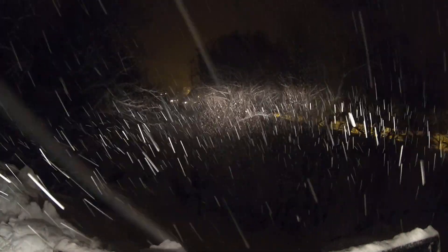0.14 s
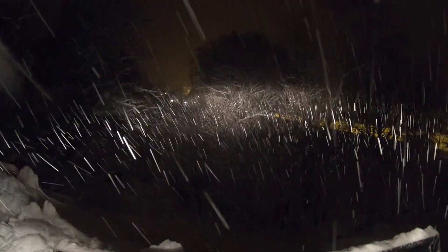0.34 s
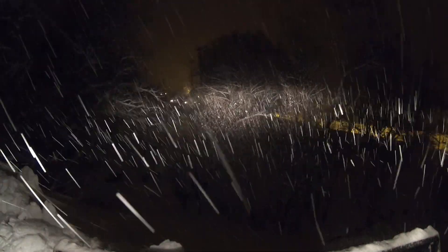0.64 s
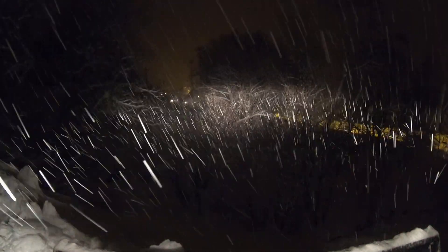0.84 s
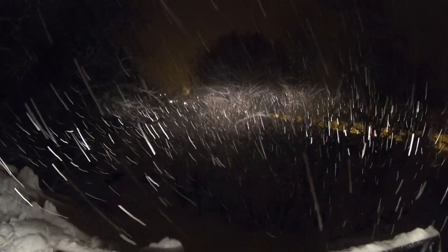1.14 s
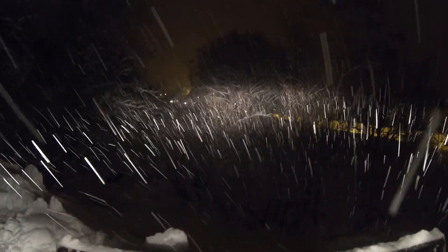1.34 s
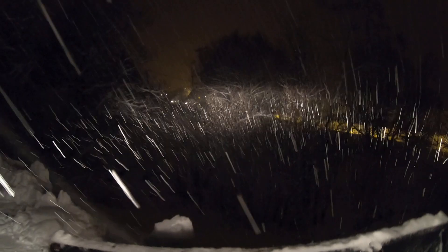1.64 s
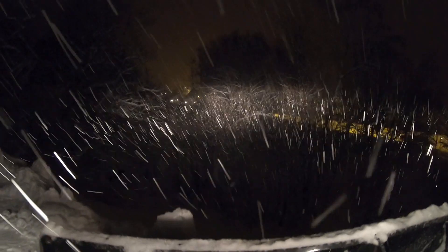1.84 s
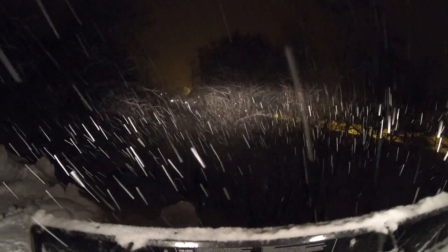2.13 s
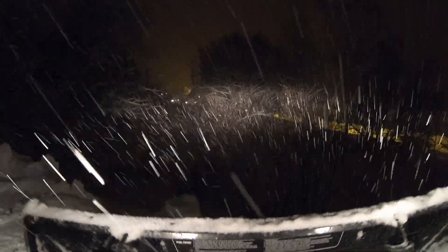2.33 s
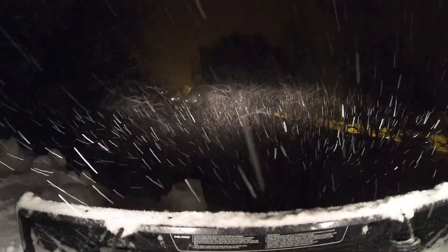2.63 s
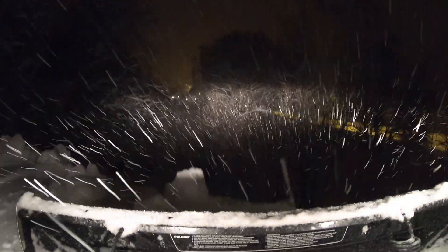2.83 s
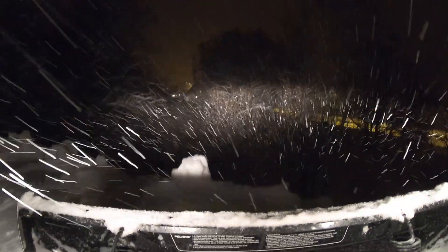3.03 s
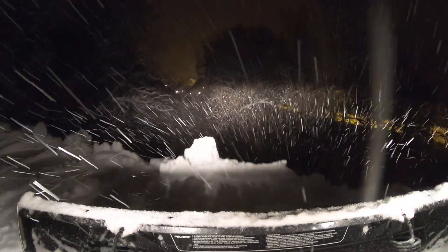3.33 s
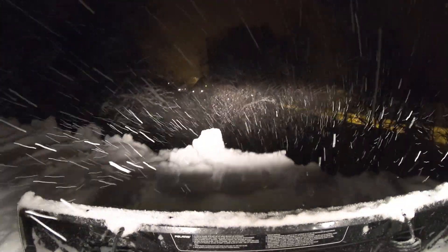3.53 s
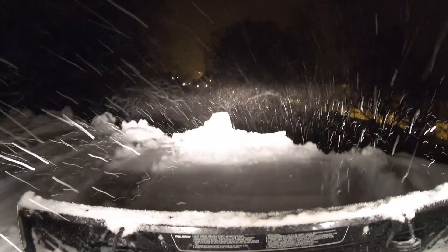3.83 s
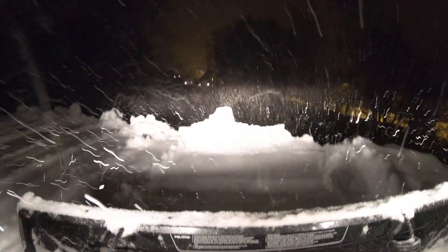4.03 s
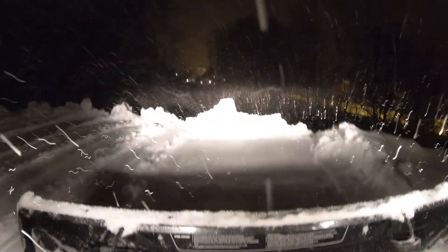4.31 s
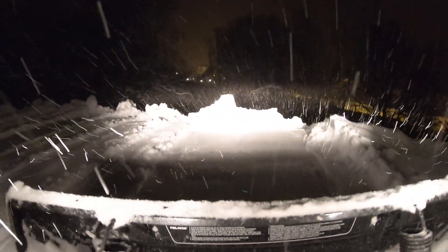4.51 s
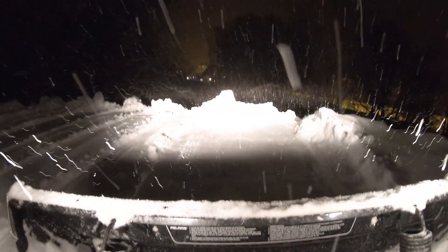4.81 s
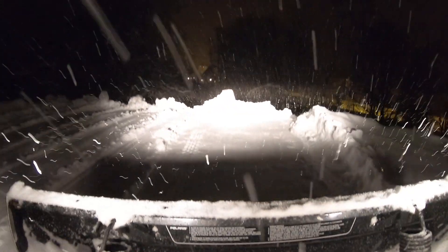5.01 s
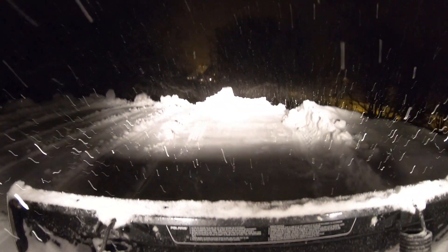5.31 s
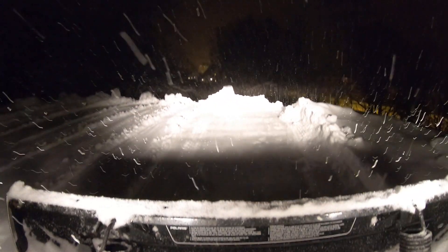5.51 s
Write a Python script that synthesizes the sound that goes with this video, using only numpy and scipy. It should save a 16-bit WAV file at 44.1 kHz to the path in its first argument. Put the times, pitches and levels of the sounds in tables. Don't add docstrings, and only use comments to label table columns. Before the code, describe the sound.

Low engine putter, a heavy jolt, blade scrape and sharp clacks, a geared motor whir, then a climbing engine drone with faint bracket chatter.

```python
import sys
import numpy as np
from scipy import signal
from scipy.fft import rfft, irfft, next_fast_len
from scipy.io import wavfile
from scipy.ndimage import map_coordinates

SR = 44100
rng = np.random.default_rng(int(sys.argv[2]) if len(sys.argv) > 2 else 0)


def field_ratio(decibels):
    return 10 ** (np.asarray(decibels, dtype=float) / 20)


def generate_wav(signal):
    frames = np.transpose(np.atleast_2d(signal))
    scaled = np.clip(frames, -1, 1) * 32767
    pcm = np.round(scaled).astype(np.int16)
    wavfile.write(sys.argv[1], SR, pcm)


N = 249606
T = np.arange(N) / SR

# freq_hz, gain_db
TOP_LOSS = [(9000, 0.5), (11000, 2.5), (13000, -24.5), (16000, -47)]
# freq_hz, level_db
WHINE_TONES = [(11752, -75), (12252, -78)]
# freq_hz, width_hz, level_db
PANEL_MODES = [(860, 30, -3), (1045, 55, 0)]
# freq_hz, density_db_per_hz
FIZZ_SPECTRUM = [(6000, -61.5), (7200, 0.5), (9000, -5), (11000, -28), (14000, -65)]
IDLE_WHISTLE_HZ, IDLE_WHISTLE_DB = 708, -58.5

# start_s, stop_s, level_db
CHATTER_BOUTS = [
    (4.305, 4.554, -57),
    (4.682, 4.855, -63),
    (4.887, 5.103, -61),
    (5.15, 5.24, -62.5),
    (5.286, 5.603, -63),
    (5.623, 5.698, -76),
]
# freq_hz, width_hz, level_db
BRACKET_MODES = [(4420, 610, -2), (6190, 530, -1), (8860, 1760, -18), (2580, 300, -9.5), (13560, 1100, -17)]
# position_cycles, level_db
BRACKET_TAPS = [(.14, -2), (.215, -10), (.455, -5)]
# rate_firings_per_s, advance_cycles
TAP_ADVANCE = [(23.3, .035), (25, 0)]
LULL_START_S, LULL_STOP_S, LULL_DB = 4.67, 5.7, -67
CHATTER_EDGE_S, SAG_DB_PER_S = .005, 12

# start_s, stop_s, gear_hiss_db, drum_tone_db
WINCH_RUNS = [
    (1.443, 2.474, -44.5, -42),
    (4.362, 4.553, -51.5, -60),
]
# freq_hz, density_db_per_hz
GEAR_SPECTRUM = [(1820, -41), (3100, -18.5), (3320, -9.5), (3570, -14), (3750, -6.5), (4330, -5.5),
                 (4690, 0.5), (5180, -2), (6240, 1), (6680, -3.5), (7080, -20), (7400, -15), (9620, -31),
                 (16300, -120)]
# freq_hz, width_hz, level_db
DRUM_MODES = [(948, 58, 0), (1610, 100, -9), (2030, 60, -8), (522, 42, -3)]
# time_s, level_db
RELAY_BLOWS = [
    (1.42, -33.5),
    (2.49, -27.5),
    (4.555, -36.5),
]
# freq_hz, width_hz, level_db
COVER_MODES = [(4730, 170, -39), (5780, 99, -8.5), (6390, 51, -4.5)]
# freq_hz, width_hz, level_db
STRUCK_DRUM_MODES = [(953, 48, 1.5)]
INRUSH_DB, INRUSH_S, SPIN_UP_S = 4, 0.18, 0.081
OVERRUN_S = .012

# time_s, peak_db, t60_s
SNAP_HITS = [(1.062, -37, 0.02), (1.2324, -34, 0.018), (1.2855, -23, 0.02), (1.2944, -23, 0.026),
             (1.3064, -32, 0.02), (1.3389, -32, 0.14), (1.3454, -43, 0.027), (1.4097, -28.5, 0.07),
             (1.4214, -30.5, 0.082), (1.4344, -31, 0.039), (2.4877, -26, 0.075), (2.5651, -40, 0.03),
             (2.577, -36.5, 0.049), (2.596, -39.5, 0.081), (2.6144, -41, 0.052), (2.6773, -44.5, 0.062),
             (2.7077, -37.5, 0.021), (2.7526, -44, 0.1), (2.7841, -39, 0.037), (3.1293, -43, 0.062),
             (3.2894, -46, 0.027), (3.4835, -43, 0.064), (3.7778, -41, 0.12), (3.8427, -39.5, 0.12),
             (3.9025, -47, 0.048), (4.1355, -41, 0.028), (4.3515, -24, 0.018), (4.5545, -24.5, 0.04),
             (4.6034, -47, 0.037), (4.6743, -38, 0.059)]
# freq_hz, density_db_per_hz
SNAP_SPECTRUM = [(1470, -53), (2500, -10), (2920, -13.5), (3740, -10.5), (4590, 0.5), (5430, -1),
                 (6310, -7), (6610, -7), (6980, -16.5), (7400, -13), (9620, -29.5), (13500, -46.5),
                 (16300, -120)]
# time_s, peak_db, t60_s
CHAIN_HITS = [(.72, -38, 0.11), (.797, -37.5, 0.069), (.951, -32, 0.021), (1.285, -38, .05),
              (1.343, -38, .035), (1.412, -34.5, 0.18), (2.565, -41, 0.12), (2.596, -28.5, 0.059),
              (2.614, -35.5, 0.11), (2.66, -41, .03), (2.68, -35.5, 0.15), (2.866, -36, 0.056),
              (3.842, -35.5, 0.11), (4.673, -38, 0.12)]
# freq_hz, density_db_per_hz
CHAIN_SPECTRUM = [(300, -120), (550, 0.5), (760, 3.5), (1300, -2.5), (2200, -2.5), (2900, -13.5),
                  (4500, -12.5), (8000, -120)]
# time_s, peak_db, t60_s
THUD_HITS = [(.893, -31, 0.036), (.952, -31, 0.035), (.992, -38, .03), (1.011, -30, 0.087),
             (1.225, -26, 0.05), (1.269, -22, 0.041), (1.283, -34, 0.055), (1.42, -29, 0.15),
             (1.445, -29.5, 0.11), (3.842, -35, 0.088)]
# freq_hz, density_db_per_hz
THUD_SPECTRUM = [(150, -120), (280, -23.5), (480, 3.5), (800, -9), (1500, -25), (3000, -41.5), (6000, -120)]
# time_s, peak_db, t60_s
PIN_HITS = [
    (2.593, -29, .06),
    (2.612, -34, .06),
]
# freq_hz, density_db_per_hz
PIN_SPECTRUM = [(400, -120), (600, -14), (760, 0), (950, -8), (1400, -120)]
# time_s, level_db
SCRAPE_LEVEL = [(1.17, -71), (1.2, -35.5), (1.26, -37), (1.286, -31), (1.402, -42), (1.412, -37),
                (1.45, -38)]
# freq_hz, density_db_per_hz
BLADE_SPECTRUM = [(120, -25.5), (200, -5), (255, 2), (324, -11), (495, -9), (559, -16.5), (612, -14.5),
                  (1470, -20.5), (2690, -30), (5070, -25), (7400, -39.5), (9620, -54), (16300, -120)]

# time_s, peak_db, pitch_hz, t60_s
FRAME_JOLTS = [
    (0.724, -20.5, 51.3, 0.32),
    (0.782, -13, 50, 0.27),
    (1.629, -31, 55.3, 0.58),
    (2.87, -32, 49.4, .15),
]
# time_s, half_width_s, boom_db, sway_db
FRAME_HEAVES = [(.83, 0.19, -38.5, -25.5), (1.28, 0.25, -32, -28), (1.6, 0.096, -29.5, -25.5),
                (2.0, 0.31, -34.5, -38.5), (2.58, .13, -31.5, -29), (2.879, 0.34, -40.5, -28),
                (3.45, 0.24, -35.5, -51.5), (3.8, 0.29, -33, -53), (4.45, 0.12, -47, -26.5)]
# freq_hz, density_db_per_hz
MOUNT_SPECTRUM = [(12, -120), (20, -25), (30, -5.5), (55, 7), (90, -3), (130, -4.5), (170, -50),
                  (300, -120)]
# freq_hz, lag_cycles
MOUNT_PHASE = [(42, -.35), (60, 0), (80, .5), (93, .41), (106, .32)]
# freq_hz, level_db
MOUNT_SECOND = [(42, -34), (55, -21.5), (59, -30), (67, -29.5), (75, -47), (86, -40.5), (93, -32),
                (100, -29.5), (110, -24.5)]

# freq_hz, density_db_per_hz
BOOM_SPECTRUM = [(88, -16.5), (150, 1), (172, -1), (248, -0.5), (344, -11), (500, -11.5), (650, -35),
                 (1100, -120)]
# freq_hz, density_db_per_hz
VALVE_SPECTRUM = [(240, -28.5), (400, -4.5), (700, -6.5), (1050, -8.5), (1360, -15), (1600, -12.5),
                  (2180, -15), (2720, -25), (3300, -29.5), (4300, -22.5), (6000, -26.5), (7400, -45.5),
                  (9620, -76), (16300, -120)]
# position_cycles, width_cycles, rise_db
VALVE_EVENTS = [(0.78, 0.03, 9), (.24, .07, 2.5), (0.23, .1, 3.5), (0.97, .1, 4.5)]
WORKS_PER_THROTTLE, WORKS_PER_BOOM = 0.2, 0.13
CASE_HZ, CASE_IDLE_DB = 950, -7
TICK_HZ, TICK_SHARE = 3340, .3

# time_s, rate_firings_per_s
ENGINE_SPEED = [(0.0, 10.48), (0.59, 10.46), (0.92, 17.06), (1.07, 16.97), (1.32, 15.3), (1.5, 14.68),
                (1.61, 13.44), (1.75, 14.16), (2.72, 14.79), (3.01, 18.38), (3.43, 21.62), (3.69, 21.91),
                (3.91, 23.44), (4.39, 23.35), (4.49, 22.51), (4.93, 23.88), (5.11, 26.16), (5.66, 28.37)]
# time_s, throttle_over_idle_db, crank_pull_db
ENGINE_LOAD = [(0, 0, -58), (.62, -1, -55), (.8, 4.5, -40), (.92, 10, -20.5), (1.1, 0, -31), (1.32, 2, -30),
               (1.6, 3.5, -50), (1.8, 3, -38), (2.05, 1.5, -46), (2.55, 2.5, -55), (2.7, 5.5, -35.5),
               (2.92, 7.5, -26), (3.1, 5.5, -30.5), (3.45, 11.5, -26), (4.3, 8.5, -13.5), (4.62, 7, -22.5),
               (5.05, 10.5, -15), (5.66, 18, -15)]
# freq_hz, level_db
LOADED_PIPE = [(50, -9), (72, -10), (87, -5), (101, -8), (114, 0), (130, -8), (142, -19), (165, -25),
               (200, -26), (240, -34), (330, -48)]
# freq_hz, level_db
IDLING_PIPE = [(50, -7), (75, -6), (94, -2), (105, -4), (126, -11), (147, -15), (180, -25), (260, -29),
               (330, -42)]
# freq_hz, level_db
PIPE_THIRD = [(31, -39.5), (43, -38.5), (47, -25), (52, -28.5), (58, -28), (65, -36), (70, -45),
              (75, -33.5), (85, -34)]
# rate_firings_per_s, gain_db
MUFFLER_THINNING = [(25, 0), (27.5, -13)]
IDLE_DB, WORKS_DB, BOOM_DB, LURCH_DB = -30.5, -46.5, -40, -34.5
STEP = 16


def unit(x):
    return x / np.sqrt(np.mean(x ** 2) + 1e-20)


def along(points, hz):
    f, v = np.transpose(points)
    return np.interp(np.log(hz + 1), np.log(f + 1), v)


def curves(rows, off=None):
    s, *cols = np.transpose(rows)
    return [np.interp(T, s, c, off, off) for c in cols]


def wobble(knots_per_s):
    knots = rng.standard_normal(int(N * knots_per_s / SR) + 4)
    return map_coordinates(knots, [T * knots_per_s])


def gate(start_s, stop_s, edge_s):
    return np.clip(np.minimum(T - start_s, stop_s - T) / edge_s + 1, 0, 1)


def filtered(x, response):
    m = next_fast_len(N + 8192)
    return irfft(rfft(x, m) * response(np.fft.rfftfreq(m, 1 / SR)), m)[:N]


def coloured(spectrum):
    return unit(filtered(rng.standard_normal(N), lambda hz: field_ratio(along(spectrum, hz))))


def resonant(x, modes):
    def response(f):
        total = 0
        for k, (centre, width, db) in enumerate(modes):
            damping = 1j * f * width
            total = total + (-1) ** k * field_ratio(db) * damping / (centre ** 2 - f ** 2 + damping)
        return total
    return filtered(x, response)


def struck(rows, spectrum, rise_s):
    swell, t = np.zeros(N + SR), T[:SR // 4]
    for s, db, t60 in rows:
        decay = field_ratio(db - 60 * t / max(t60, .005))
        swell[round(s * SR):][:len(t)] += decay * (1 - np.exp(-t / rise_s))
    return swell[:N] * coloured(spectrum)


def heave(rest_db, column):
    power = field_ratio(2 * rest_db)
    for row in FRAME_HEAVES:
        power = power + field_ratio(2 * row[column]) * np.exp(-((T - row[0]) / row[1]) ** 2)
    return 10 * np.log10(power)


def whine():
    swell = np.clip((T - 1.72) / .05, 0, 1) * np.clip((1.9 - T) / .01, 0, 1)
    return swell * sum(np.sqrt(2) * field_ratio(db) * np.sin(2 * np.pi * hz * T) for hz, db in WHINE_TONES)


def hum(rate):
    panels = field_ratio(-55) * unit(resonant(rng.standard_normal(N), PANEL_MODES))
    whistle_level = np.sqrt(2) * field_ratio(IDLE_WHISTLE_DB + 1.5 * wobble(12))
    whistle = whistle_level * np.sin(2 * np.pi * IDLE_WHISTLE_HZ * T + .5 * wobble(10))
    idling = np.clip((14.5 - rate) / 2, 0, 1)
    fizz = field_ratio(-80) * unit(field_ratio(3.7 * wobble(250)) * coloured(FIZZ_SPECTRUM))
    return idling * (panels + whistle) + fizz


def bracket(cycle, rate, scatter_db=2.0, late_cycles=.009):
    turns = np.arange(0, cycle[-1], .5)
    advanced = cycle + np.interp(rate, *np.transpose(TAP_ADVANCE))
    taps = np.zeros(N)
    for at, db in BRACKET_TAPS:
        chance = rng.standard_normal((len(turns), 2))
        where = np.interp(turns + at + late_cycles * chance[:, 0], advanced, np.arange(N)).astype(int)
        np.add.at(taps, where, field_ratio(db + scatter_db * chance[:, 1]))
    rattle = signal.fftconvolve(taps, field_ratio(-60 * T[:400] / .0055))[:N]
    buzz = .06
    grit = (rattle + buzz) * rng.standard_normal(N) + 1.6 * taps
    level = field_ratio(LULL_DB) * gate(LULL_START_S, LULL_STOP_S, CHATTER_EDGE_S)
    for start, stop, db in CHATTER_BOUTS:
        level = level + field_ratio(db - SAG_DB_PER_S * (T - start)) * gate(start, stop, CHATTER_EDGE_S)
    return field_ratio(9.5) * level * unit(resonant(grit, BRACKET_MODES))


def winch(cycle):
    out = np.zeros(N)
    for start, stop, hiss_db, tone_db in WINCH_RUNS:
        running = gate(start, stop + OVERRUN_S, .002)
        inrush_db = INRUSH_DB * np.exp(-abs(T - start) / INRUSH_S)
        flicker_db = .8 * np.cos(2 * np.pi * cycle) + .7 * wobble(40)
        out += running * field_ratio(hiss_db + inrush_db + flicker_db) * coloured(GEAR_SPECTRUM)
        tone = resonant(resonant(rng.standard_normal(N), DRUM_MODES), DRUM_MODES)
        drum = unit(field_ratio(1.5 * wobble(45)) * tone)
        spin_up = np.clip((T - start) / SPIN_UP_S, 0, 1) ** 2
        out += running * spin_up * field_ratio(tone_db) * drum
    blows = np.zeros(N)
    for s, db in RELAY_BLOWS:
        blows[round(s * SR)] = field_ratio(db + 51.0)
    drum_ring = resonant(resonant(blows, STRUCK_DRUM_MODES), STRUCK_DRUM_MODES)
    return out + resonant(blows, COVER_MODES) + drum_ring


def knocks():
    scrape = field_ratio(curves(SCRAPE_LEVEL, -120)[0] + 3.3 * wobble(60)) * coloured(BLADE_SPECTRUM)
    snaps = field_ratio(-3) * struck(SNAP_HITS, SNAP_SPECTRUM, rise_s=.001)
    chain = struck(CHAIN_HITS, CHAIN_SPECTRUM, rise_s=.0006)
    thuds = struck(THUD_HITS, THUD_SPECTRUM, rise_s=.002)
    pin = struck(PIN_HITS, PIN_SPECTRUM, rise_s=.002)
    return snaps + chain + thuds + scrape + pin


def jolts():
    out, t = np.zeros(N + SR), T[:SR // 2]
    for s, db, hz, t60 in FRAME_JOLTS:
        envelope = field_ratio(db - 60 * t / t60) * (1 - np.exp(-t / 0.0055))
        out[round(s * SR):][:len(t)] += envelope * np.sin(2 * np.pi * hz * t)
    return out[:N]


def shake(cycle, rate, crank_db, second_db):
    crank = field_ratio(crank_db) * np.cos(2 * np.pi * (2 * cycle + .47))
    second = field_ratio(second_db) * np.cos(2 * np.pi * (4 * cycle - along(MOUNT_PHASE, 4 * rate)))
    sway = field_ratio(heave(LURCH_DB, column=3)) * coloured(MOUNT_SPECTRUM)
    return np.sqrt(2) * (crank + second) + sway


def works(cycle, rate, throttle_db):
    boom_db = heave(BOOM_DB, column=2)
    works_db = WORKS_DB + WORKS_PER_THROTTLE * throttle_db + WORKS_PER_BOOM * (boom_db - BOOM_DB)
    sharp = np.clip(1.5 - rate / 21, .2, 1)
    idling = np.clip((14 - rate) / 3, 0, 1)
    gate_db = 0
    for at, width, db in VALVE_EVENTS:
        gate_db = gate_db + sharp * db * np.exp(-.5 * ((cycle % 1 - at) / width) ** 2)
    swell_db = 2.6 * sharp * np.cos(2 * np.pi * (cycle - .2)) + 1.7 * wobble(18) - 2.5 * idling
    boom = field_ratio(swell_db) * coloured(BOOM_SPECTRUM)
    noise = field_ratio(.7 * wobble(25) + 1.0 * wobble(150)) * coloured(VALVE_SPECTRUM)
    case = filtered(noise, lambda hz: 1 / (1 + (hz / CASE_HZ) ** 4))
    tick = filtered(noise, lambda hz: 1 - 1 / (1 + (hz / TICK_HZ) ** 4))
    middle = noise - case - tick
    clatter = field_ratio(gate_db) * (middle + field_ratio(CASE_IDLE_DB * idling) * case)
    clatter += field_ratio(TICK_SHARE * gate_db) * tick
    return field_ratio(boom_db - 3.0) * unit(boom) + field_ratio(works_db) * unit(clatter)


def exhaust(cycle, rate, level_db, third_db):
    level_db = level_db + .5 * wobble(3.5)
    cycle, rate, level_db, third_db = (v[::STEP] for v in (cycle, rate, level_db, third_db))
    load = np.interp(rate, [10.6, 13.5], [0, 1])
    delay_s = .012 + .010 * load

    def tone(order):
        lag = delay_s * 25 * np.log(np.cosh((order * rate - 62) / 25))
        return np.cos(2 * np.pi * (order * cycle + .45 - lag))

    thinning_db = np.interp(rate, *np.transpose(MUFFLER_THINNING))
    out = field_ratio(third_db) * tone(3)
    for order in range(5, 28):
        hz = order * rate
        pipe_db = load * along(LOADED_PIPE, hz) + (1 - load) * along(IDLING_PIPE, hz)
        pipe_db += thinning_db * np.clip((hz - 145) / 15, 0, 1)
        out += field_ratio(level_db + pipe_db) * tone(order)
    return np.sqrt(2) * map_coordinates(out, [np.arange(N) / STEP], mode="nearest")


def scene():
    rate, = curves(ENGINE_SPEED)
    throttle_db, crank_db = curves(ENGINE_LOAD)
    cycle = .11 + np.cumsum(rate) / SR
    background = hum(rate) + bracket(cycle, rate)
    handling = winch(cycle) + knocks() + jolts()
    engine = shake(cycle, rate, crank_db, along(MOUNT_SECOND, 4 * rate))
    engine = engine + works(cycle, rate, throttle_db)
    engine = engine + exhaust(cycle, rate, IDLE_DB + throttle_db, along(PIPE_THIRD, 3 * rate))
    return (background + handling + engine)[None]


def roll_off(x):
    return signal.sosfilt(signal.butter(12, 15676, fs=SR, output="sos"), x)


def record(dry):
    muffled = filtered(dry[0], lambda hz: field_ratio(along(TOP_LOSS, hz))) + whine()
    fade = np.clip((T[-1] - T) / 0.0017, 0, 1)
    return roll_off((muffled * fade)[None])


dry = scene()
out = record(dry)
generate_wav(out)
```